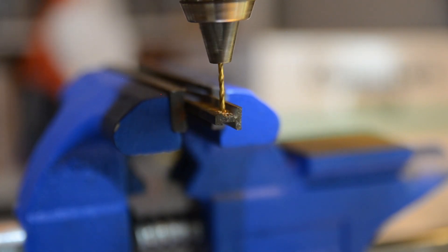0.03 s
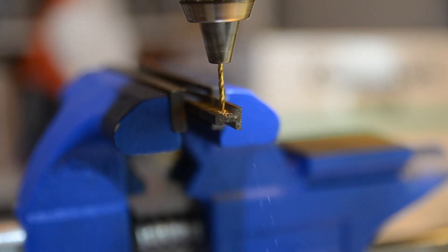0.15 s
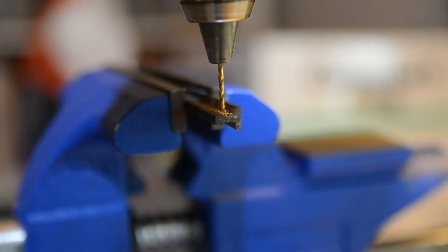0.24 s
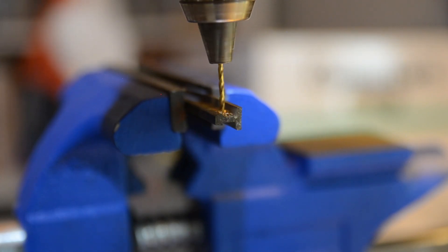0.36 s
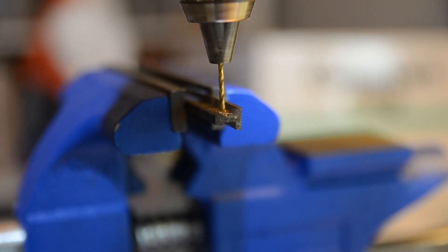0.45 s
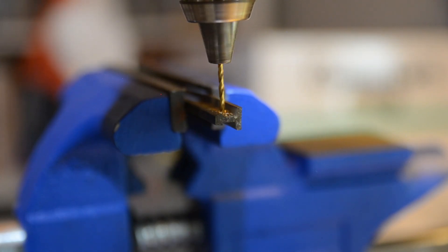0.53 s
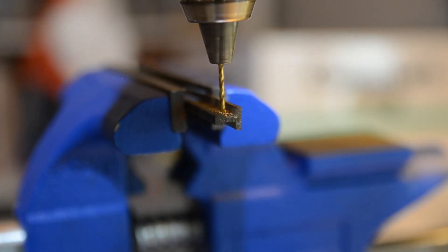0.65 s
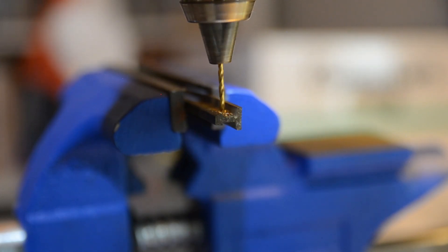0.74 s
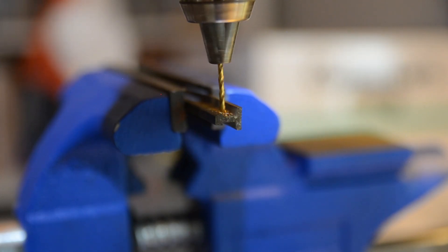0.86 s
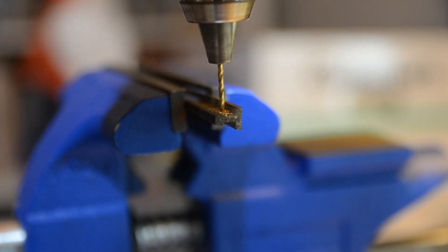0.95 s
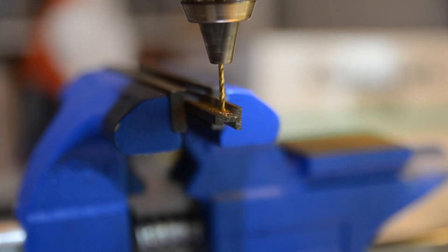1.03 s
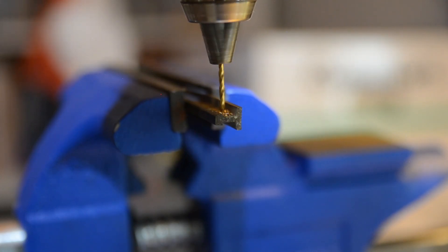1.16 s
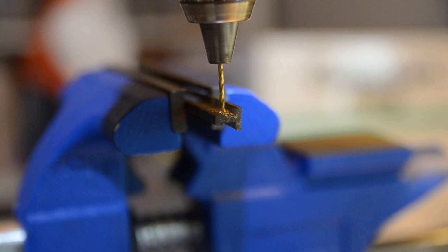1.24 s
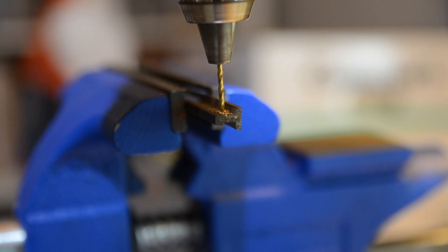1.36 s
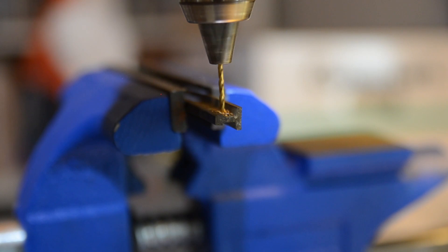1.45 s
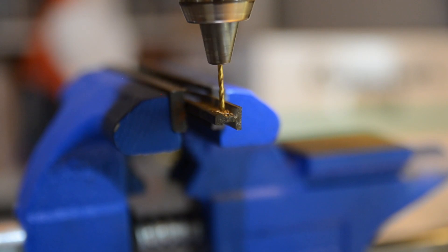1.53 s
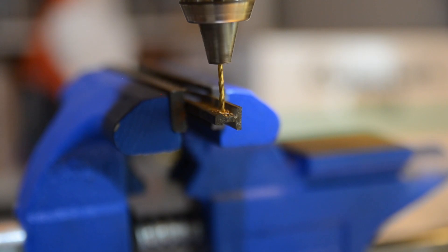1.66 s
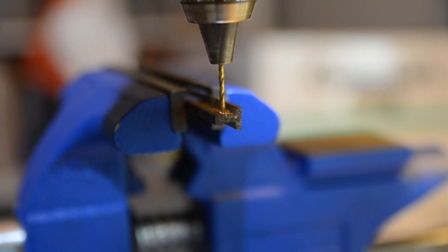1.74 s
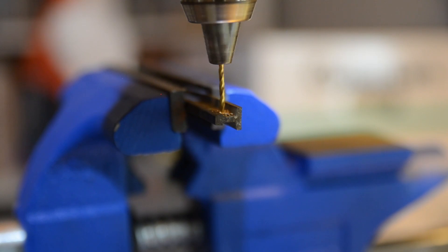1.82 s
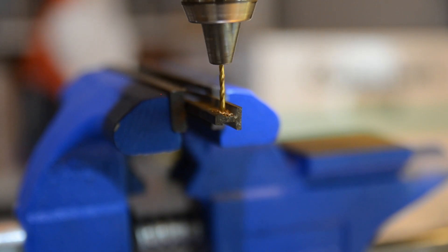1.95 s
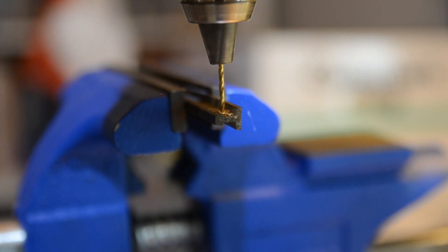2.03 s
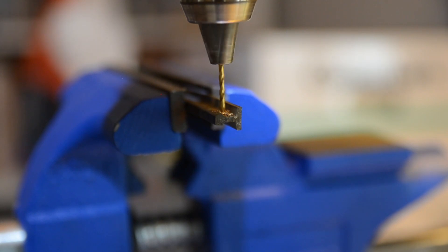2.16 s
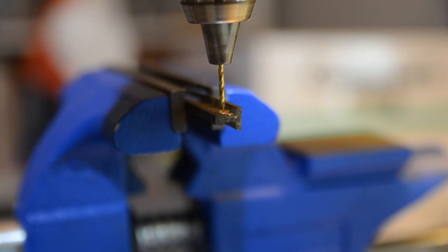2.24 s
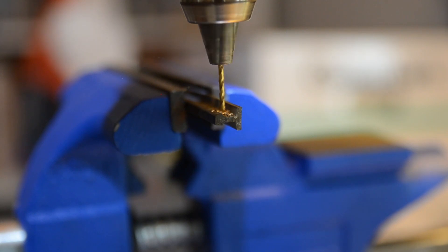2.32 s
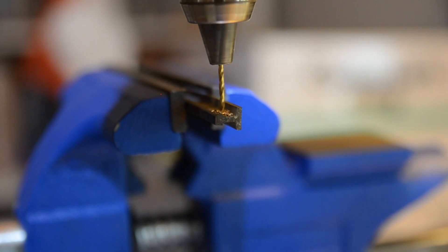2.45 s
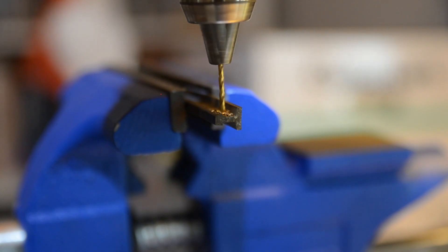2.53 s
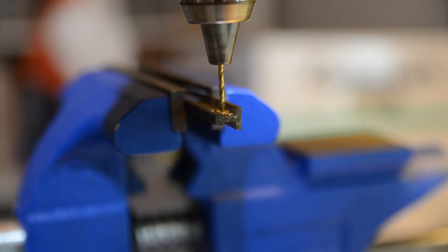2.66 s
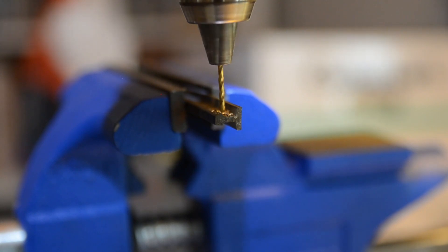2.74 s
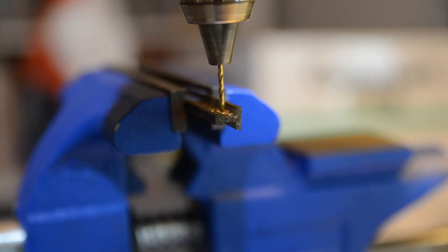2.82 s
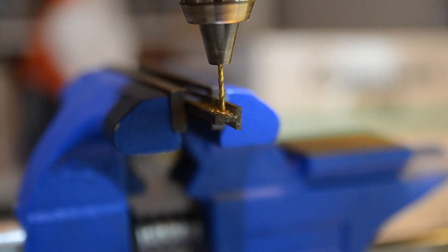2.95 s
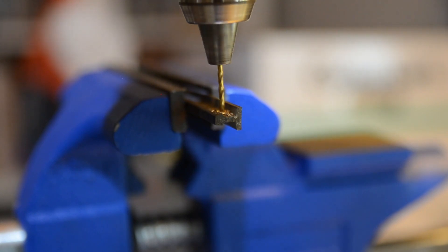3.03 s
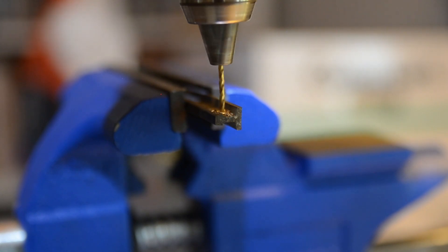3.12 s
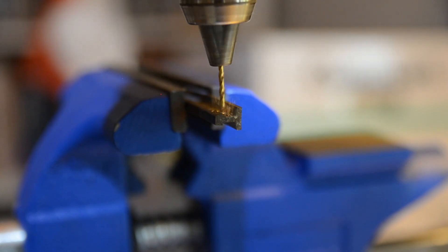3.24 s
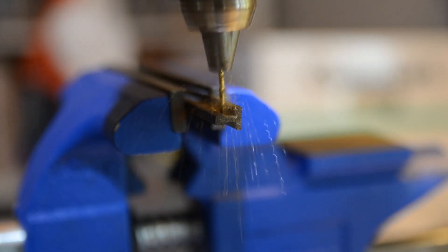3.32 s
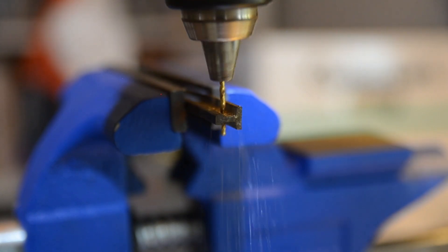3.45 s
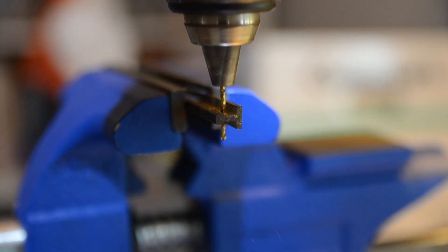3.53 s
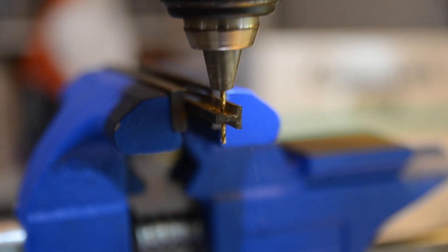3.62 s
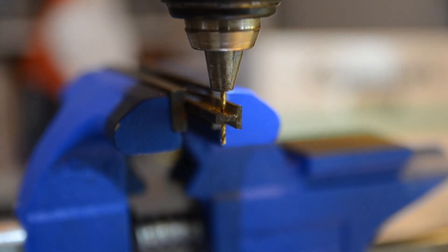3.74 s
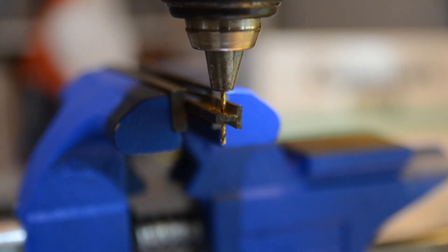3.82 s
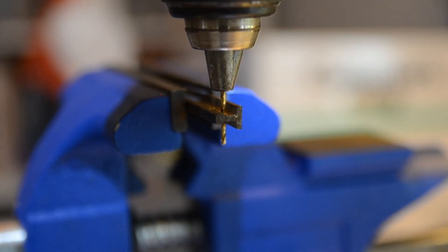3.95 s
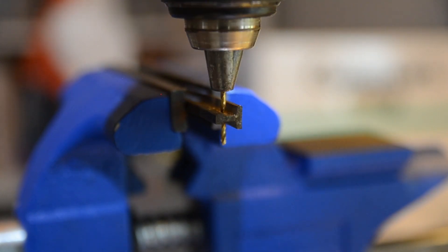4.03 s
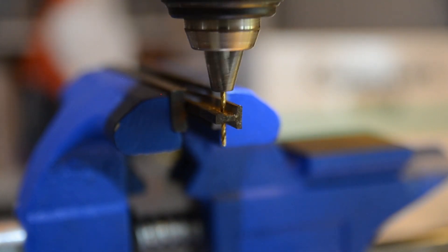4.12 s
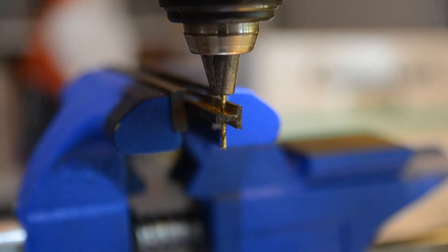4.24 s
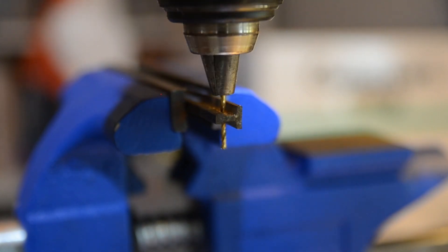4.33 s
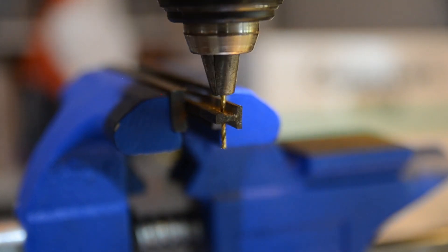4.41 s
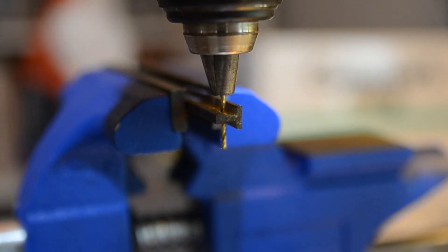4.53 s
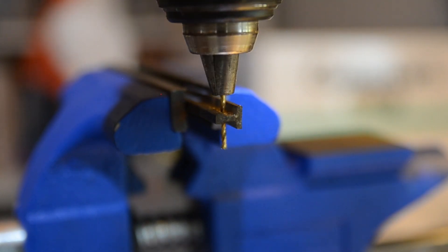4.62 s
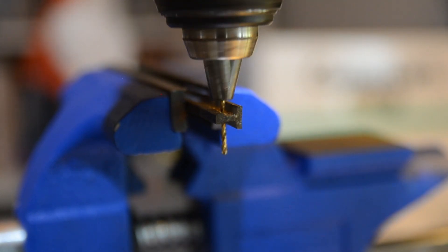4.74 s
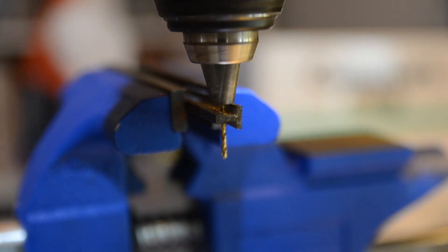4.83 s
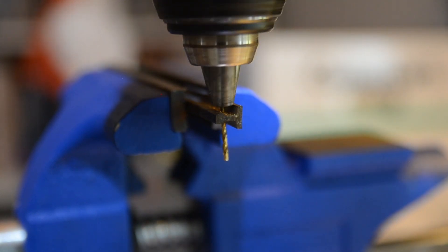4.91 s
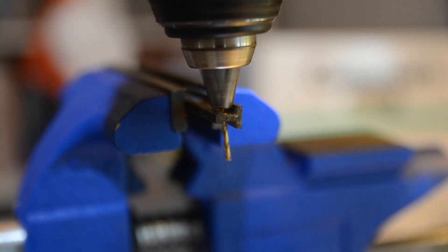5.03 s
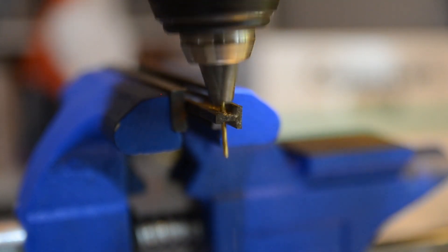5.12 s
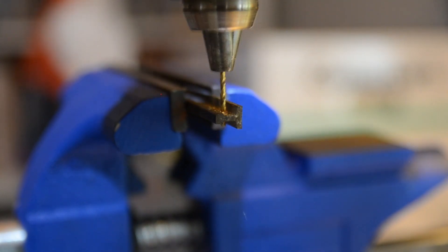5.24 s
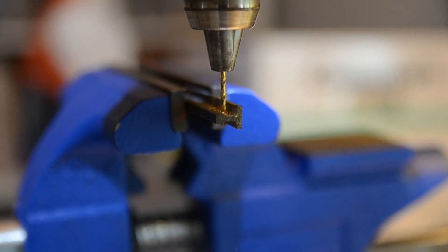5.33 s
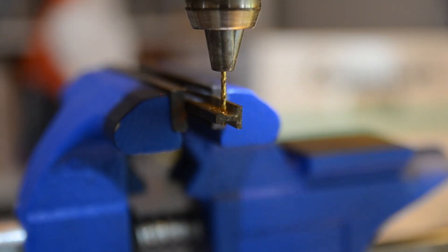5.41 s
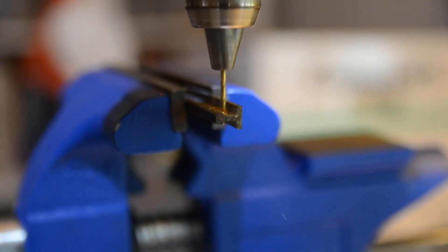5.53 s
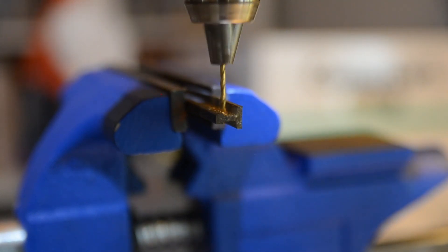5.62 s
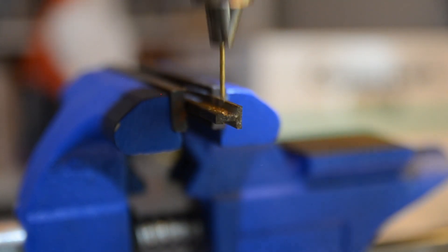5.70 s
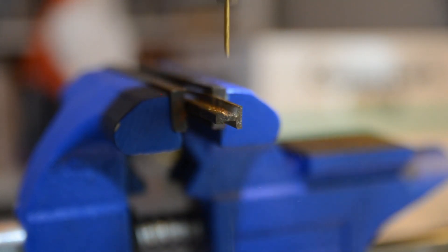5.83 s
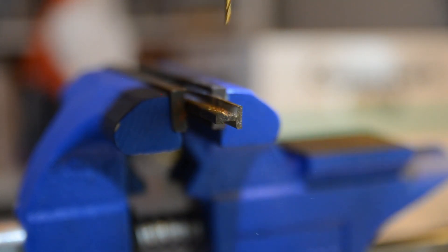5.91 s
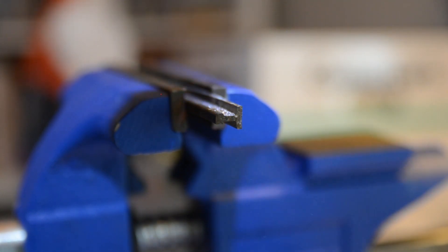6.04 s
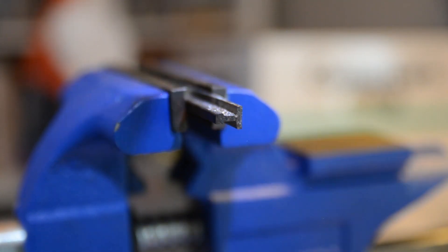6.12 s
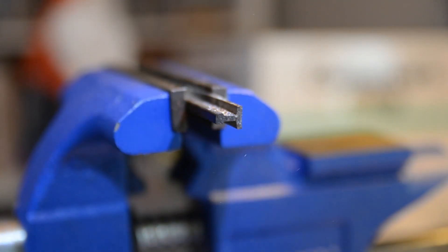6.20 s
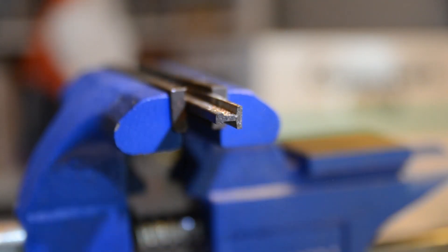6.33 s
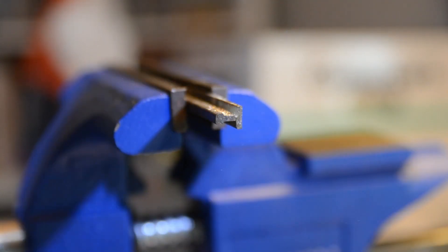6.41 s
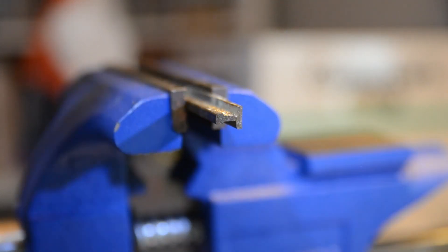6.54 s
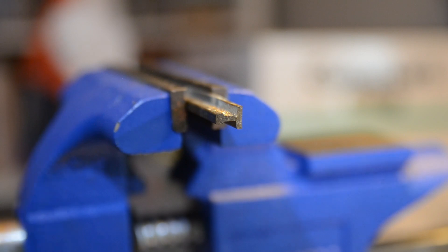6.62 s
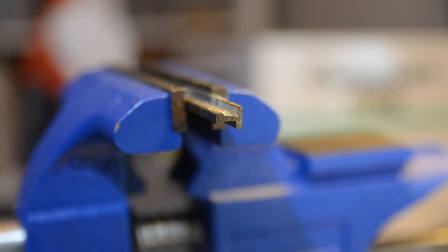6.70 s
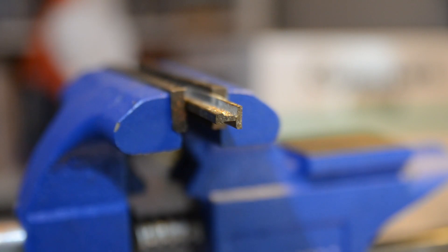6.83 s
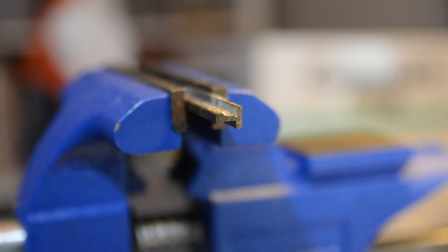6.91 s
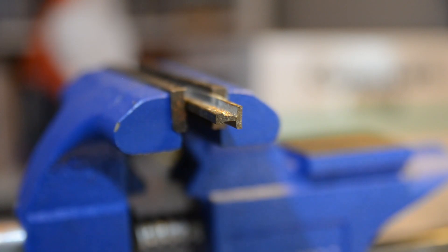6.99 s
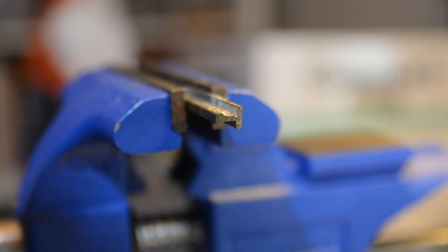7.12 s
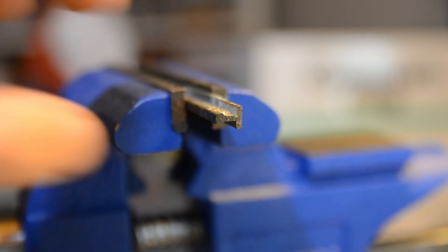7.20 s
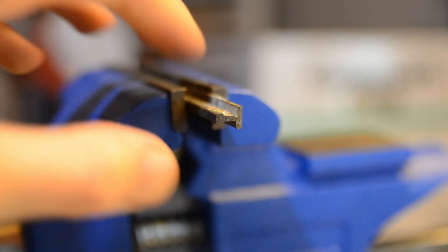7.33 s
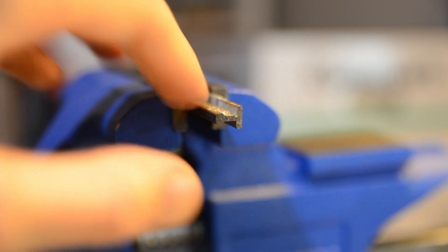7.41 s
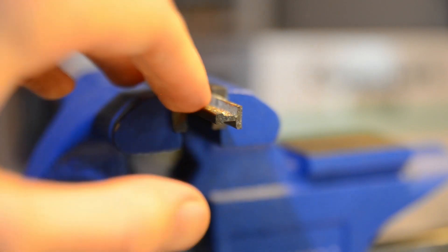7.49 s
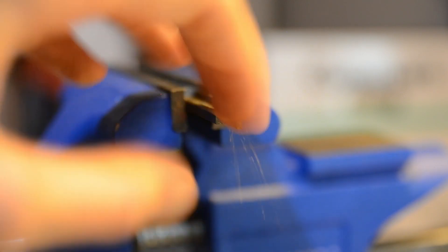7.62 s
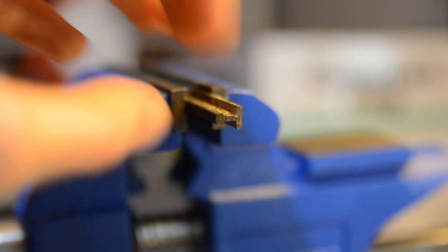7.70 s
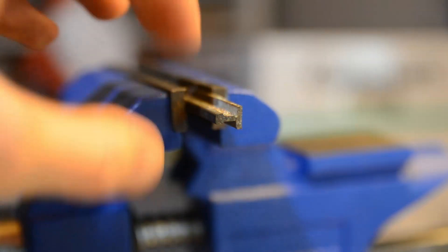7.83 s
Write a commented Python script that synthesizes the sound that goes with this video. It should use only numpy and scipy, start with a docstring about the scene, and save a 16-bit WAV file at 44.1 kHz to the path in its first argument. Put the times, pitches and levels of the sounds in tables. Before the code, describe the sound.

A small cordless drill whines and rattles steadily through brass, squeals and knocks as it breaks through, spurts several times, then is set down.

```python
"""Small workshop, one microphone, the tool close and the room behind it: a cordless drill bores brass in a vise.
From the start its gears whine and rattle in a plastic housing under a chopped-current buzz; near 3.3 s
the bit grabs and breaks through with squeals and a knock, and from 3.5 s it runs free and stops.
Short spurts from 4 to 6 s work it free, with trigger and brake clicks and finger rubs between;
faint squeaks follow, knocks ring the bench as the tool is laid down near 7.1 s, and last rubs and squeaks end it."""
import sys
import numpy as np
from scipy import signal
from scipy.fft import rfft, irfft, next_fast_len
from scipy.io import wavfile
from scipy.ndimage import uniform_filter1d, map_coordinates

SR = 44100
rng = np.random.default_rng(int(sys.argv[2]) if len(sys.argv) > 2 else 0)


def master_out(mix):
    """Clip the mix to full scale and print it as 16-bit PCM to the path in sys.argv[1]."""
    frames = np.transpose(np.atleast_2d(mix))
    ceiling = np.clip(frames, -1, 1)
    pcm = np.round(ceiling * 32767).astype(np.int16)
    wavfile.write(sys.argv[1], SR, pcm)


N = 346619

# spectrum of the steady background air: [f/Hz, relative level/dB per Hz]
AIR_SPECTRUM = [(15, -48), (25, -17), (54, -9), (86, -8.5), (109, -7.5), (312, -3.5), (594, -7.5),
                (676, -8), (3430, -17), (11800, -30.5), (15300, -64), (22000, -120)]
AIR_DB = -60.5
# decay of the workshop's reverberation: [f/Hz, t60/s]
ROOM_DECAY = [(100, .9), (500, 0.31), (2000, 0.38), (5000, 0.3), (12000, .25)]
ROOM_DB = -11.0
# dips and a slight bump in the microphone's response: [f/Hz, width/Hz, gain/dB]
MIC_RESPONSE = [(5680, 650, -7.5), (6845, 270, -8.5), (7960, 310, -5.5), (9200, 300, 0.5),
                (12700, 870, -4.5)]
MIC_TOP_HZ = 15800

# spectrum of the shaking bench: [f/Hz, relative level/dB per Hz]
BENCH_RUMBLE = [(15, -43), (30, -31), (62, -9), (112, -7.5), (170, -1.5), (246, -2), (277, 2.5),
                (448, -3.5), (600, -7), (780, -29), (1320, -120)]
# jolts passed into the bench: [t/s, deep level/dB, upper level/dB], each before its rise
BENCH_JOLTS = [(3.26, -60.5, -44.5), (3.33, -34, -29), (4.06, -72, -39.5), (4.605, -69.5, -59.5),
               (4.645, -65, -40.5), (5.02, -67.5, -40), (5.13, -72.5, -44), (5.25, -50, -49),
               (5.44, -65, -40), (5.74, -66.5, -46.5), (7.13, -52, -45), (7.22, -54, -37.5),
               (7.43, -59, -40.5)]
JOLT_RISE_S, DEEP_T60_S, UPPER_T60_S = 0.012, 1.4, 0.55
BENCH_SPLIT_HZ = 155  # between deep and upper shaking
HUM_DEEP_DB, HUM_UPPER_DB = -76.5, -62.5  # steady shaking while the bit cuts
# knocks on the bench:
# [t/s, level/dB, relative crack level/dB, relative clatter level/dB, hardness as mode tilt/dB per octave]
BENCH_KNOCKS = [(3.337, -19.5, 4, 8.5, -1), (7.132, -13.5, -12, -4.5, .2), (7.149, -23.5, -2, -4, 8),
                (7.213, -26, -17, 1, -9), (7.222, -23.5, -20, 0.5, 1.5), (7.43, -42, -24.5, -8.5, -4),
                (7.439, -31.5, -12.5, -1, 2), (7.474, -48, -8, -9, -3)]
# ringing modes of the wooden top: [f/Hz, relative level/dB, t60/s]
WOOD_MODES = [(368.4, -8, 0.15), (600, -11, 0.087), (810, 0, 0.08), (1430, -4, 0.039), (2270, -3.5, 0.02)]
KNOCK_RISE_S = 0.001
SNAP_DB, SNAP_T60_S = 4, 0.012  # the sharp front of a knock, relative to its level

# a blip, squeals and squeaks: [t/s, length/s, f/Hz, half-width/Hz, level/dB before the envelope]
SQUEAK_EVENTS = [(0.829, 0.022, 600, 150, -38), (3.25, .08, 7670, 88.6, -20.5),
                 (3.331, 0.03, 2340, 92.6, -17), (6.359, 0.12, 4940, 100, -61),
                 (6.491, 0.051, 5200, 150, -69), (6.572, .09, 5100, 151, -71),
                 (7.62, 0.093, 2210, 90, -50.5), (7.598, 0.046, 6570, 205, -64)]
# soft rubs of fingers on the tool: [t/s, length/s, f/Hz, half-width/Hz, level/dB before the envelope]
FINGER_RUBS = [(3.853, 0.013, 8050, 2510, -54), (3.942, .018, 5240, 4030, -47.5),
               (3.986, 0.014, 4300, 3500, -45), (4.043, .014, 4970, 2990, -48.5),
               (4.606, 0.041, 2500, 2000, -50.5), (5.998, 0.45, 3900, 1375, -57),
               (6.17, 0.07, 8440, 2450, -53.5), (6.21, 0.0069, 7570, 2000, -50),
               (6.343, .006, 6400, 1510, -53.5), (7.77, .012, 7550, 1500, -66.5),
               (7.72, 0.19, 2830, 1200, -62.5)]
SQUEAK_RISE = 0.15  # share of the length

# trigger, brake and chuck clicks: [t/s, upper-band level/dB, low part relative to it as level/dB]
PLASTIC_CLICKS = [(3.343, -3, 11.5), (3.3548, 9.5, -10.5), (3.4135, 5.5, -7.5), (4.0523, -11.5, 6.5),
                  (4.0595, -8.5, 0), (4.1081, -0.5, 4.5), (4.2114, 2.5, -7.5), (4.6074, -19, 1.5),
                  (4.649, -18.5, 14.5), (5.2276, 8, -12), (5.2607, 12, -7.5), (5.4312, 4, -5.5),
                  (5.659, 13, -17), (5.7392, 5.5, -9.5), (5.8966, 7.5, -12), (6.0196, -9.5, -5.5)]
CLICK_RISE_S, CLICK_T60_S = 0.0017, 0.011

# each pull of the trigger, a list of rows: [t/s, gear-mesh f/Hz, tooth pressure as level/dB]
TRIGGER_PULLS = [
    [(0, 1205, -0.5), (.5, 1216, -1), (1.3, 1216, -.5), (1.5, 1226, 1), (1.75, 1238, -1), (2.6, 1238, -.5),
     (3.15, 1238, -1), (3.23, 1236, .5), (3.32, 1223, -.5), (3.5, 1233, -1), (3.54, 1140, 2.5),
     (3.58, 1012, -1.5), (3.615, 955, 4), (3.632, 849, -5), (3.648, 594, 0)],
    [(4.055, 348.3, -3), (4.085, 543, -2), (4.105, 659.6, 4.5), (4.125, 861, 0), (4.145, 898, 2.5),
     (4.175, 857, -0.5), (4.2, 763, -6), (4.215, 749, 2.5)],
    [(4.65, 435.5, -5), (4.676, 710.8, -1), (4.7, 932.3, 1), (4.725, 1016, 3.5), (4.78, 886, -0.5),
     (4.84, 738.7, -1.5), (4.9, 598.3, -1), (4.96, 475.2, -1), (5.0, 443, -2), (5.03, 1024, -4.5),
     (5.06, 1940, 0), (5.09, 2327, 1), (5.125, 2465, 1.5), (5.16, 2631, 1.5), (5.2, 2545, 0),
     (5.228, 2413, 2), (5.245, 1457, -0.5), (5.262, 700, -4)],
    [(5.435, 428, -3.5), (5.455, 800, 1), (5.48, 1366, .5), (5.51, 1827, 1.5), (5.545, 2035, .5),
     (5.58, 2109, 1.5), (5.61, 2032, 0), (5.628, 1767, -4), (5.645, 740, -3.5), (5.66, 559, -4)],
    [(5.742, 416, -3), (5.762, 788.5, 1.5), (5.782, 1227, 4), (5.805, 1640, -3.5), (5.835, 1930, 0),
     (5.86, 1814, 1.5), (5.875, 1402, -1.5), (5.887, 743, -5.5), (5.897, 626, -1)],
]
TEETH = 10  # mesh cycles per turn of the shaft
BORING_HZ = 1240  # mesh pitch above which the teeth strike harder
# shaft and gear tones of steady strength: [multiple of shaft speed, relative level/dB]
STEADY_SHAFT_TONES = [(1, -23), (5, -19.5), (6, -12.5), (7, -6.5), (10.4, -7.5), (11, -10.5), (17, -13.5),
                      (18, -28.5), (19, -20.5), (21, -13.5), (22, -18.5), (26, -26.5), (28, -32),
                      (29, -11.5), (31, -25), (32, -15.5), (40.72, -12), (59, -17.5), (70, -21), (71, -20),
                      (79, -28), (87, -29.5), (89, -18.5)]
# shaft tones that grow with speed above boring speed: [multiple of shaft speed, relative level/dB]
GROWING_SHAFT_TONES = [(2, -22), (3, -15.5), (50, -16), (60, -17.5)]
# how well the housing sounds a shaft tone: [f/Hz, gain/dB]
HOUSING_SINGS = [(100, -29.5), (500, -14), (780, -4), (1225, -5), (1800, -3), (2600, -1), (3200, -7),
                 (3700, 8), (5000, 11), (7500, 9.5), (9600, 6), (11000, 2), (13500, -12), (15000, -33)]
LOADED_DB, FREE_DB = -29, -31  # steady shaft tones while boring and running free
GROWING_DB, GROWING_HARDER_DB = -28, 12.5  # growing shaft tones; gain per doubling above boring speed
# how loud the mesh tone sounds at its pitch: [f/Hz, level/dB]
MESH_LEVEL = [(450, -54.5), (620, -31.5), (760, -18.5), (900, -25), (1020, -28.5), (1120, -28.5),
              (1213, -26), (1240, -32), (1500, -39.5), (1800, -35.5), (2050, -30.5), (2300, -29),
              (2550, -21)]
# overtones of the mesh tone: [multiple of mesh pitch, relative level/dB]
MESH_OVERTONES = [(2, -0.8), (3, -3.5), (4, -6.5)]
# how loud an overtone sounds at its pitch: [f/Hz, level/dB]
OVERTONE_LEVEL = [(900, -53.5), (1400, -36.5), (1850, -33), (2300, -33.5), (2650, -28.5), (3100, -31),
                  (3700, -26.5), (4200, -28.5), (4900, -32), (5500, -28), (6200, -27.5), (7500, -34),
                  (10500, -34)]
OVERTONE_HARDER_DB = 6.5  # gain per doubling of speed above boring speed
ROUGH_DB = 1.87  # fast flutter of the tones for each kHz above boring speed
SLIP_DB = 1  # tone lost for each doubling of speed per tenth of a second while speeding up
CHOP_HZ, BUZZ_DB = 120.17, -41.5  # the speed control chops the current; its buzz while boring
# tones of the chopped current: [multiple of the chopping rate, relative level/dB]
CHOP_TONES = [(1, -23.5), (3, -22.5), (5, -5.5), (6, 0.5), (7, 2), (8, -3.5), (9, -6.5), (13, -7),
              (18, -12), (21, -8), (22, -1.5), (23, 1), (24, -4.5)]
# spectrum the housing radiates: [f/Hz, relative level/dB per Hz]
HOUSING_SPECTRUM = [(100, -54), (500, -31), (800, -16.5), (1300, -14.5), (3000, -13), (3600, -5), (5000, 1),
                    (6200, -2), (7500, -3.5), (9600, -11), (10300, -18.5), (13400, -23.5), (14900, -45),
                    (15200, -72.5)]
HOUSING_SPLIT_HZ = 3000  # body noise below, rattle above
# rattle set by the speed: [gear-mesh f/Hz, level/dB]
RATTLE_LEVEL = [(350, -46), (480, -28.5), (700, -22), (900, -21), (1230, -17), (1900, -13.5), (2600, -17)]
# body noise set by the speed: [gear-mesh f/Hz, level/dB]
BODY_LEVEL = [(350, -43.5), (480, -36), (800, -35.5), (1230, -33), (1900, -32), (2600, -32)]
TORQUE_DB = 1.5  # body noise gained for each doubling of speed per tenth of a second, speeding up or braking
LET_GO_S, LET_GO_FADE_S = 3.5, 0.015  # the load ends
BITE_S, BITE_LENGTH_S, BITE_DB = 3.3, 0.057, 5.5  # the bit grabs as it breaks through


def amp(db):
    """Turns dB into amplitude."""
    return 10 ** (np.asarray(db) / 20)


def unit(x):
    """Brings a sound to an RMS of 1."""
    return x / np.sqrt(np.mean(x ** 2) + 1e-20)


def along(points, hz):
    """Reads a (Hz, value) curve on a log frequency axis."""
    f, v = np.transpose(points)
    return np.interp(np.log(hz + 1), np.log(f + 1), v)


def filtered(x, response):
    """Multiplies the spectrum of x by a response of frequency."""
    m = next_fast_len(len(x) + 8192)
    return irfft(rfft(x, m) * response(np.fft.rfftfreq(m, 1 / SR)), m)[:len(x)]


def band(x, low_hz, high_hz):
    """A causal band-pass."""
    return signal.sosfilt(signal.butter(2, [low_hz, high_hz], "bandpass", fs=SR, output="sos"), x)


def wobble(n, rate):
    """A smooth random curve, rate knots a second."""
    return map_coordinates(rng.standard_normal(int(n * rate / SR) + 4), [np.arange(n) * rate / SR])


def add(track, s, sound):
    """Mixes a sound in at s seconds."""
    part = track[round(s * SR):][:len(sound)]
    part += sound[:len(part)]


def loaded(t):
    """1 while the bit cuts brass, 0 once it runs free."""
    return np.clip((LET_GO_S - t) / LET_GO_FADE_S + 1, 0, 1)


def background_air():
    """Steady noise with the spectrum of the workshop's air."""
    return amp(AIR_DB) * unit(filtered(rng.standard_normal(N), lambda hz: amp(along(AIR_SPECTRUM, hz))))


def room(near):
    """The room's diffuse answer, drawn afresh each quarter second; each frequency dies at its own speed."""
    out, step = np.zeros(N), SR // 4
    for start in range(0, N, step):
        hz, t, z = signal.stft(rng.standard_normal(SR), SR, nperseg=256)
        decay = amp(-60 * t / along(ROOM_DECAY, hz)[:, None])
        tail = signal.istft(z * decay, SR, nperseg=256)[1]
        answer = signal.fftconvolve(near[start:start + step], tail / np.linalg.norm(tail))
        add(out, start / SR + 0.006, answer)  # 6 ms behind the direct sound
    return out


def bench_shaking():
    """Boring shakes the bench steadily, and each jolt swells fast and dies away."""
    now = np.arange(N) / SR
    in_band = lambda keep: unit(filtered(rng.standard_normal(N), lambda hz: amp(along(BENCH_RUMBLE, hz)) * keep(hz)))
    deep = in_band(lambda hz: hz < BENCH_SPLIT_HZ)
    upper = in_band(lambda hz: hz >= BENCH_SPLIT_HZ)
    s, deep_db, upper_db = np.transpose(BENCH_JOLTS)[:, :, None]
    since = np.maximum(now - s, 0)
    rise = 1 - np.exp(-since / JOLT_RISE_S)

    def shake(db, t60, hum_db):
        """Steady shaking under load plus the decaying jolts."""
        return amp(hum_db) * loaded(now) + (amp(db - 60 * since / t60) * rise).sum(axis=0)

    return shake(deep_db, DEEP_T60_S, HUM_DEEP_DB) * deep + shake(upper_db, UPPER_T60_S, HUM_UPPER_DB) * upper


def bench_knocks():
    """A knock rings the modes of the top, rattles what lies on it and has a sharp noisy front."""
    out, t = np.zeros(N), np.arange(SR // 3) / SR
    noise = lambda: rng.standard_normal(len(t))
    for s, db, crack_db, clatter_db, hard_db in BENCH_KNOCKS:
        ring = 0
        for hz, level, t60 in WOOD_MODES:
            mode_db = level + hard_db * np.log2(hz / 1000) + rng.normal(0, 0.87)
            ring = ring + amp(mode_db - 60 * t / t60) * np.sin(2 * np.pi * hz * t + 1.1 * wobble(len(t), 140))
        clatter = amp(clatter_db - 60 * t / 0.31 + wobble(len(t), 98)) * band(noise(), 230, 2200)
        crack = amp(crack_db - 60 * t / 0.037) * band(band(noise(), 2500, 8900), 2500, 9000)
        snap = amp(SNAP_DB - 60 * t / SNAP_T60_S) * band(noise(), 600, 3500)
        rise = 1 - np.exp(-t / KNOCK_RISE_S)
        add(out, s, amp(db) * rise * (ring + clatter + crack + snap))
    return out


def squeaks_and_rubs():
    """Squeaks are narrow noise and rubs wide noise, each rising fast and fading."""
    out = np.zeros(N)
    for s, length, hz, width, db in SQUEAK_EVENTS + FINGER_RUBS:
        n = round(length * SR)
        envelope = np.interp(np.arange(n) / n, [0, SQUEAK_RISE, 1], [0, 1, 0]) ** 0.5
        noise = unit(band(rng.standard_normal(n), max(hz - width, 100), hz + width))
        add(out, s, amp(db + 1.7 * wobble(n, 44)) * envelope * noise)
    return out


def clicks():
    """Plastic clicks of trigger, brake and chuck: short noise bursts in an upper and a low band."""
    out, t = np.zeros(N), np.arange(SR // 10) / SR
    for s, db, low_db in PLASTIC_CLICKS:
        envelope = amp(-60 * t / CLICK_T60_S) * (1 - np.exp(-t / CLICK_RISE_S))
        burst = envelope * rng.standard_normal((2, len(t)))
        add(out, s, amp(db) * (band(burst[0], 3700, 8000) + amp(low_db) * band(burst[1], 410, 2800)))
    return out


def tone(db, phase, waver_db):
    """A sine along a phase at an RMS level of db, its level wavering at random."""
    level = np.sqrt(2) * amp(db + waver_db * wobble(len(phase), 45))
    return level * np.sin(phase + rng.uniform(0, 2 * np.pi))


def gear_whine(t, mesh_hz, shaft, press_db, gaining):
    """Meshing teeth and the turning shaft sound tones at multiples of the shaft speed."""
    faster = np.log2(np.maximum(mesh_hz / BORING_HZ, 1))  # teeth strike harder at speed
    whine = tone(along(MESH_LEVEL, mesh_hz), TEETH * shaft, waver_db=0.73)
    for k, db in MESH_OVERTONES:
        overtone_db = db + OVERTONE_HARDER_DB * faster + along(OVERTONE_LEVEL, k * mesh_hz)
        whine += tone(overtone_db, k * TEETH * shaft, waver_db=1.0)
    growing_db = GROWING_DB + GROWING_HARDER_DB * faster
    steady_db = FREE_DB + (LOADED_DB - FREE_DB) * loaded(t)
    for table, level_db in (GROWING_SHAFT_TONES, growing_db), (STEADY_SHAFT_TONES, steady_db):
        for k, db in table:  # each tone takes the housing's colour at its momentary pitch
            colour_db = along(HOUSING_SINGS, k * mesh_hz / TEETH)
            whine += tone(level_db + db + colour_db, k * shaft, waver_db=0.84)
    flutter_db = ROUGH_DB * np.maximum(mesh_hz - BORING_HZ, 0) / 1000 * wobble(len(t), 90)
    return whine * amp(press_db + flutter_db - SLIP_DB * np.maximum(gaining, 0))


def current_buzz(t, chop):
    """The chopped motor current buzzes at multiples of its rate, only under load."""
    return amp(BUZZ_DB) * loaded(t) * sum(tone(db, k * chop, waver_db=0.75) for k, db in CHOP_TONES)


def housing_noise(t, mesh_hz, shaft, chop, gaining):
    """Teeth hiss at each contact, current pulses add throb, and loose play ticks harder the faster it runs."""
    n = len(t)
    gate = (1 + 0.15 * np.cos(TEETH * shaft)) * (1 + 0.2 * np.cos(chop)) * (1 + 0.071 * np.cos(shaft))
    gate = gate * amp(0.66 * wobble(n, 60))
    tick_db = np.minimum(4 * rng.exponential(size=n), 8)
    ticks = (rng.random(n) < 250 / SR) * amp(tick_db) * rng.choice([-1, 1], n)  # about 250 a second
    raw = unit(gate * rng.standard_normal(n)) + 0.27 * mesh_hz / 1200 * unit(ticks)
    rattle = unit(filtered(raw, lambda hz: amp(along(HOUSING_SPECTRUM, hz)) * (hz >= HOUSING_SPLIT_HZ)))
    body = unit(filtered(raw, lambda hz: amp(along(HOUSING_SPECTRUM, hz)) * (hz < HOUSING_SPLIT_HZ)))
    rattle_gain = amp(along(RATTLE_LEVEL, mesh_hz))
    body_gain = amp(along(BODY_LEVEL, mesh_hz) + TORQUE_DB * np.abs(gaining))
    bite = amp(BITE_DB * np.exp(-((t - BITE_S) / BITE_LENGTH_S) ** 2))
    return bite * (rattle_gain * rattle + body_gain * body)


def motor(rows):
    """One pull of the trigger: the speed sets gear tones and rattle; the chopped current buzzes under load."""
    s, mesh_hz, press_db = np.transpose(rows)
    t = np.arange(s[0], s[-1], 1 / SR)
    # the rotor's inertia rounds changes of speed
    mesh_hz = uniform_filter1d(np.interp(t, s, mesh_hz), size=500, mode="nearest")
    unsteady_hz = mesh_hz * (1 + 0.0006 * wobble(len(t), 30))
    shaft = 2 * np.pi * np.cumsum(unsteady_hz) / SR / TEETH  # phases in radians
    chop = 2 * np.pi * CHOP_HZ * t
    gaining = np.gradient(np.log2(mesh_hz)) * SR / 10  # doublings of speed per tenth of a second
    whine = gear_whine(t, mesh_hz, shaft, np.interp(t, s, press_db), gaining)
    noise = housing_noise(t, mesh_hz, shaft, chop, gaining)
    # short fades at the ends, but none at time zero, where the drill already runs
    edge = np.clip(np.minimum(t - s[0] + (s[0] == 0), s[-1] - t) / 0.0065, 0, 1)
    return edge * (whine + current_buzz(t, chop) + noise)


def drill():
    """Every run of the motor, one for each pull of the trigger."""
    out = np.zeros(N)
    for rows in TRIGGER_PULLS:
        add(out, rows[0][0], motor(rows))
    return out


def scene():
    """Close sounds, the room's answer to them and the air, alike on both channels."""
    near = bench_shaking() + bench_knocks() + squeaks_and_rubs() + clicks() + drill()
    return np.tile(background_air() + amp(ROOM_DB) * room(near) + near, (2, 1))


def record(dry):
    """One microphone with dips and a slight bump, soft clipping and a band limit, on both channels."""
    response = lambda hz: amp(sum(db * np.exp(-(2 * (hz - c) / w) ** 2) for c, w, db in MIC_RESPONSE))
    x = filtered(dry[0], response)
    x = x / (1 + np.abs(x / 1.02) ** 8) ** (1 / 8)
    return np.tile(filtered(x, lambda hz: hz < MIC_TOP_HZ), (2, 1))


dry = scene()
out = record(dry)
master_out(out)
```